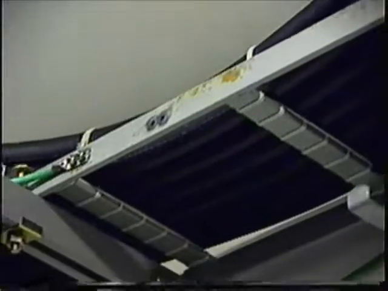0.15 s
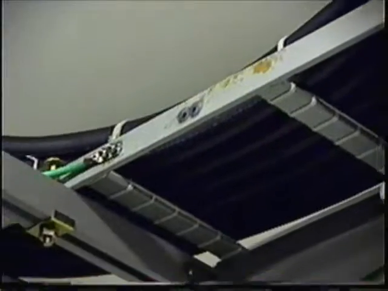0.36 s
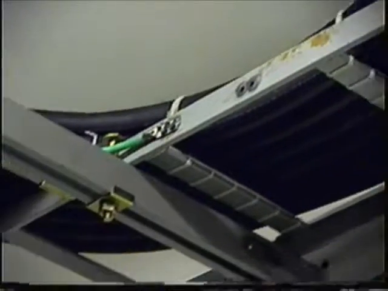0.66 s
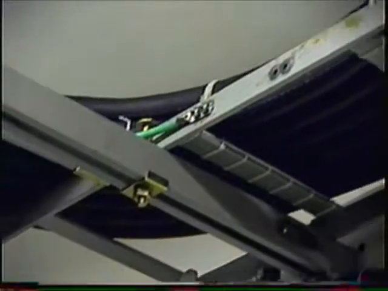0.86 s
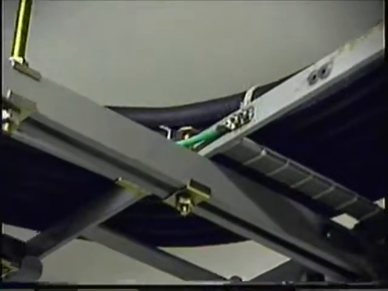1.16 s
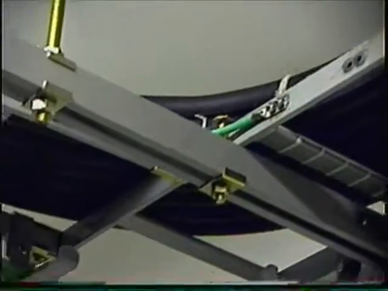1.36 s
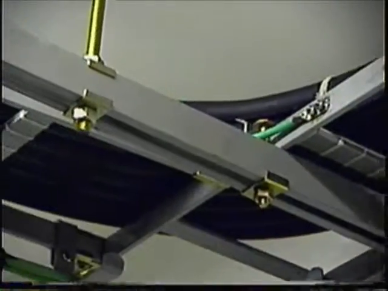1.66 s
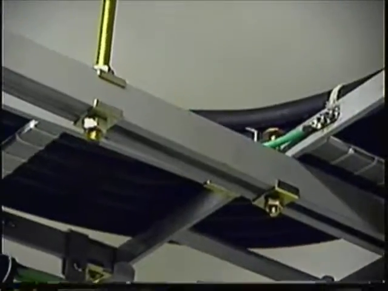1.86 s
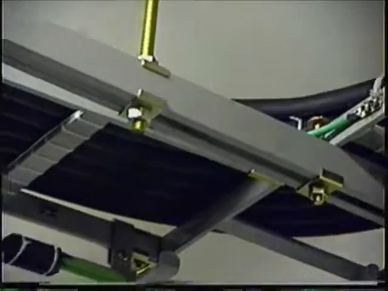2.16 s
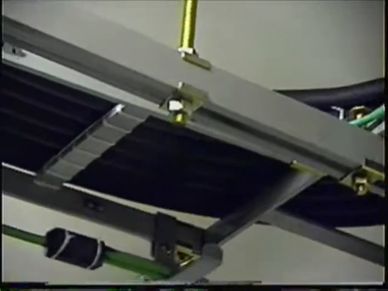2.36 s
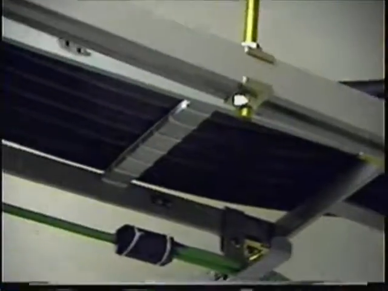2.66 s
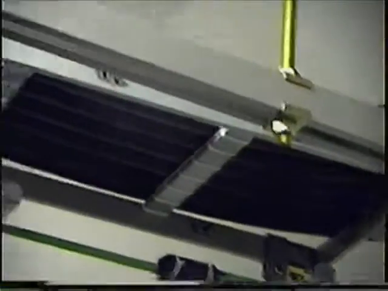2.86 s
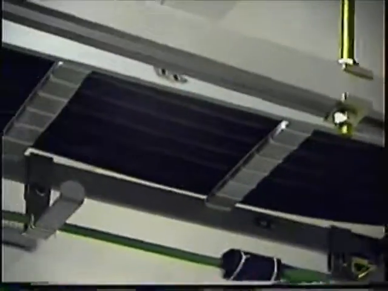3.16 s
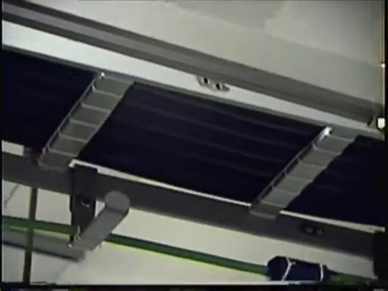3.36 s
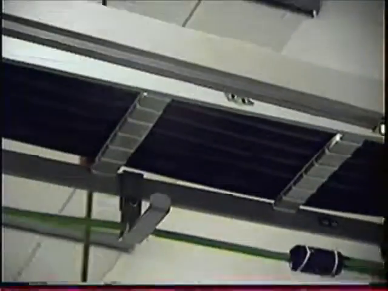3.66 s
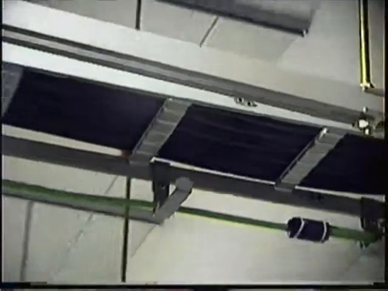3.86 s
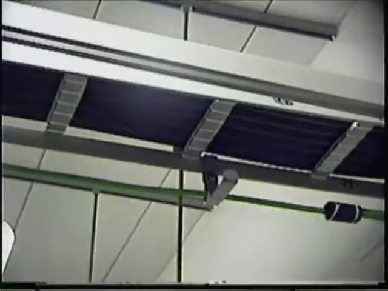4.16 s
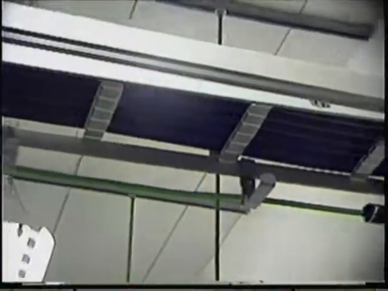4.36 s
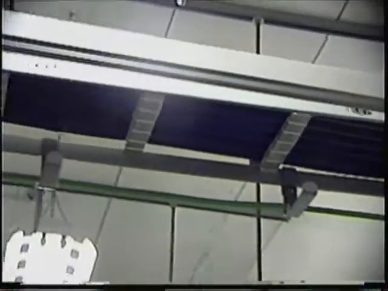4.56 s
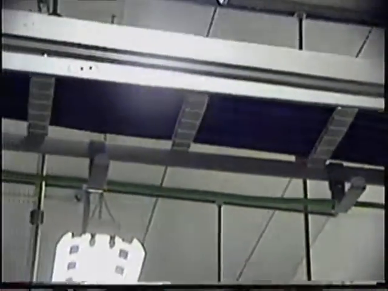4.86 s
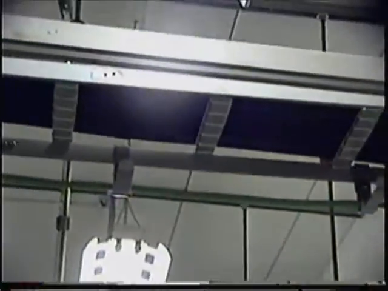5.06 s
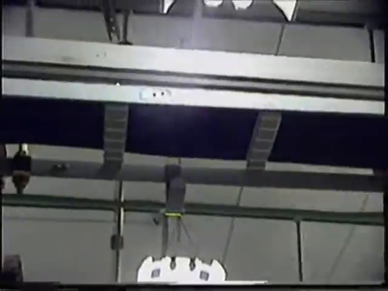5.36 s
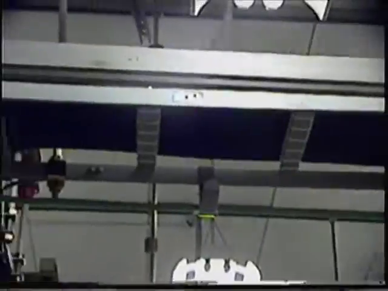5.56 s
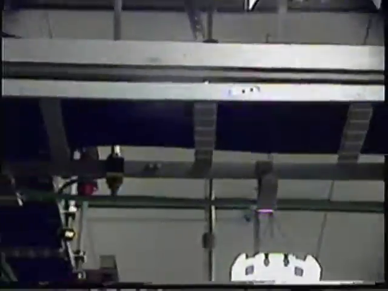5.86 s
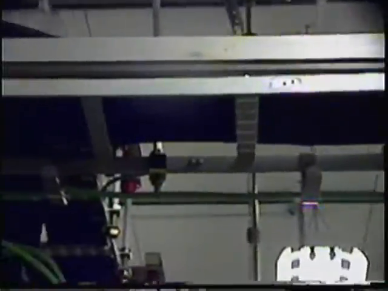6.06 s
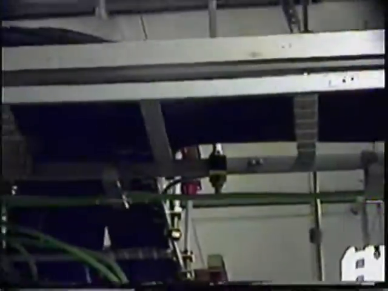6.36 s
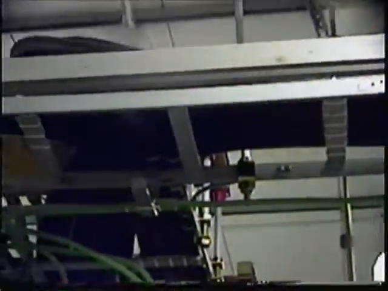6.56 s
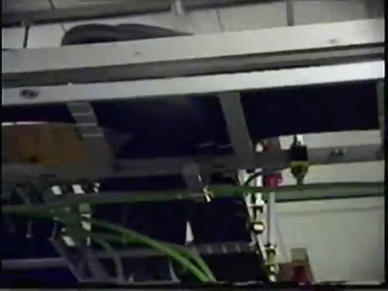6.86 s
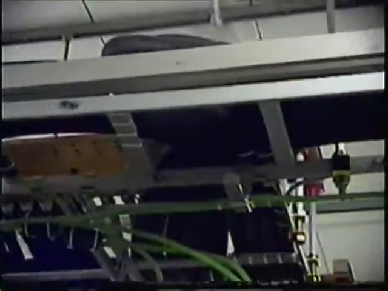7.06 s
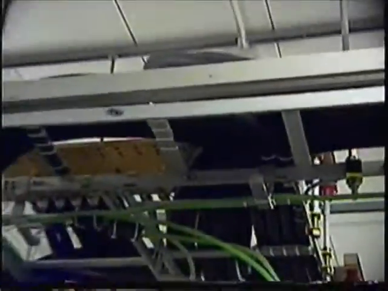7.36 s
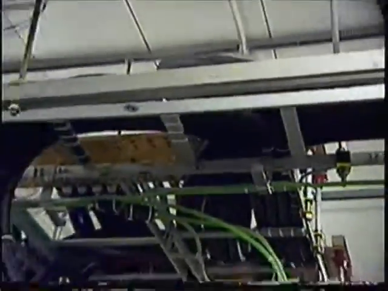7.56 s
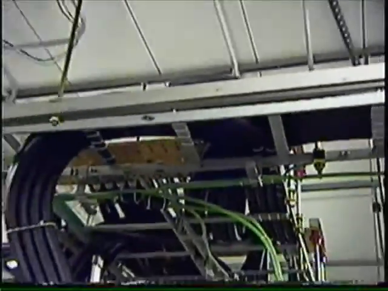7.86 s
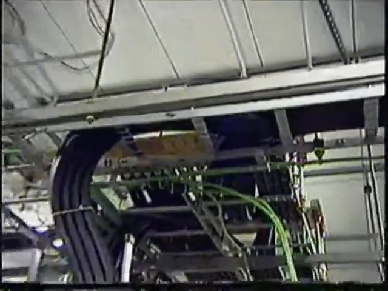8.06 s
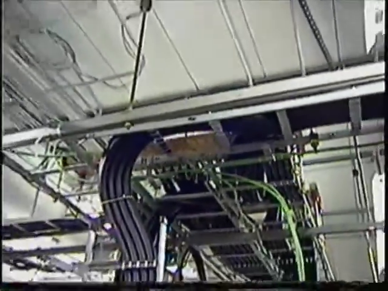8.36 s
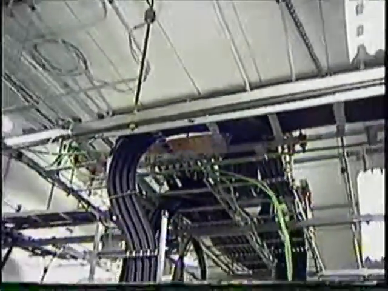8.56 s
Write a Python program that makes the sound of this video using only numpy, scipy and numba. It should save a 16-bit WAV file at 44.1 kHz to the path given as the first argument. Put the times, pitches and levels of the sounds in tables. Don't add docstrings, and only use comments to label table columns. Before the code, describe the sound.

Transformer-like drone, raspy buzz and fluttering fan whine continue under high hiss, broken by faint handling clicks and a brief brush at the end.

```python
import sys
import numpy as np
from scipy import signal
from scipy.fft import rfft, irfft, next_fast_len
from scipy.io import wavfile
from scipy.ndimage import uniform_filter1d
from numba import njit

SR = 44100
rng = np.random.default_rng(int(sys.argv[2]) if len(sys.argv) > 2 else 0)


def undo_db(level):
    steps = np.asarray(level, float) / 20
    return 10 ** steps


def to_wav(sig):
    pcm = np.clip(np.atleast_2d(sig), -1, 1) * 32767
    pcm = np.round(pcm).astype(np.int16)
    wavfile.write(sys.argv[1], SR, pcm.T)


N = 383669

MAINS_HZ, MOTOR_HZ, SCAN_HZ, FIELD_HZ = 60.0035, 162.8, 15734.26, 59.94
WHINE_HZ, WHINE_DB, OCTAVE_DB = 1131.7, -44.1, -64.2
TURN_S, TURN_WIDTH_S = 4.5, .2
MOTOR_SWING_DB = -15.1
AIM_OCTAVES, PANEL_OCTAVES = .09, .006
HOP_SAMPLES = 441

TIME_S = np.arange(N) / SR
FRAME_S = np.arange(N // HOP_SAMPLES + 2) * HOP_SAMPLES / SR
TURNED = 1 / (1 + np.exp((TURN_S - FRAME_S) / TURN_WIDTH_S))
SWING = 1.3 * np.clip(FRAME_S / FRAME_S[-1] * 1.6 - .3, 0, 1) - .15

# f/Hz, level/dB per Hz
AIR_DENSITY = [(20, -100), (36, -90), (55, -99.2), (90, -87), (200, -87), (300, -83.5), (450, -88.5),
               (800, -87), (1400, -89), (1850, -92), (2250, -89.5), (2700, -95), (3200, -91), (3650, -92),
               (4200, -86), (5000, -86)]
# f/Hz, level/dB per Hz
TAPE_DENSITY = [(7000, -91), (7650, -95), (8600, -103), (9800, -108.8), (11500, -113.8), (14000, -114.5),
                (15000, -109.3), (15600, -105.6)]
# f/Hz, width/Hz, level/dB per Hz, share of time/1
PATCHES = [(1700, 400, -125, 0.055), (2650, 600, -104, .45), (4020, 920, -102, .1), (5720, 700, -94, .22),
           (7360, 660, -105, 0.053), (8000, 700, -112, 0.062), (9100, 950, -114, .2),
           (10600, 800, -120, 0.073), (15400, 700, -110, .15)]
# t/s, half length/s, f/Hz, gain/dB
AIM = [(2.41, 0.3, 2960.0, 2.0), (5.67, 0.5, 2960.0, -2.7), (4.09, 0.3, 3370.0, 2.6),
       (7.94, 0.5, 3520.0, 2.3), (5.8, 0.3, 3840.0, -2.7), (8.36, 0.3, 4010.0, 2.8),
       (0.33, 0.5, 4190.0, -1.7), (4.69, 0.15, 4190.0, 3.6), (6.59, 0.3, 4190.0, 4.0),
       (3.02, 0.5, 4370.0, 2.0), (5.94, 0.5, 4570.0, -2.2), (0.19, 0.5, 4770.0, -2.8),
       (4.37, 0.3, 4770.0, -2.3), (2.79, 0.9, 4980.0, 2.6), (6.08, 0.9, 5200.0, -3.2),
       (1.3, 0.3, 5430.0, 2.8), (4.78, 0.3, 5670.0, -2.8), (4.64, 0.5, 7040.0, -2.8),
       (6.73, 0.9, 7040.0, 2.1), (7.29, 0.3, 8020.0, 2.0)]
# t/s, relative speed/1
TRAVEL = [
    (0, .7),
    (4.2, .7),
    (4.5, 1.6),
    (5, .8),
    (6.8, .8),
    (7.3, 2.2),
    (8.7, 2.2),
]
# t/s, half length/s, f/Hz, gain/dB
STANDING_WAVES = [(0.11, 1.04, 240, 2.4), (4.41, 0.12, 300, 9.6), (0.28, 0.98, 360, -6.4),
                  (8.7, 1.37, 360, -10.4), (0.0, 1.5, 480, 4.8), (8.36, 0.73, 600, -12.2),
                  (7.3, 0.1, 660, 7.8), (0.31, 0.48, 720, 8.5), (1.37, 0.35, 720, 6.5),
                  (4.91, 0.24, 720, -6.2), (6.22, 0.27, 720, -6.6), (7.45, 0.38, 720, -4.2),
                  (3.9, 0.48, 780, 4.9), (8.7, 0.6, 780, -9.3), (8.1, 0.74, 840, 8.3),
                  (5.78, 1.36, 960, -5.6), (6.78, 1.5, 1080, -16.1), (8.43, 1.5, 1200, -7.1),
                  (7.53, 0.13, 1320, -18.0), (8.25, 0.6, 1320, 5.4), (5.88, 0.14, 1440, 8.9),
                  (8.01, 1.5, 1560, -15.7), (4.38, 1.17, 1680, 5.7), (7.07, 0.43, 1800, -13.2),
                  (8.35, 0.18, 1800, -14.5), (3.46, 1.5, 1920, 4.6), (6.65, 0.74, 1920, -8.6),
                  (7.94, 0.4, 2040, -8.0), (4.93, 1.5, 2160, -18.0), (7.13, 0.46, 2160, -10.8),
                  (2.36, 0.19, 2280, 10.0), (3.08, 1.45, 2280, -5.2), (8.35, 1.22, 2280, -12.7),
                  (3.79, 1.5, 2400, -7.0), (8.32, 0.29, 2400, -9.4), (6.44, 1.28, 2520, -14.0),
                  (4.17, 0.58, 2640, 6.1), (1.85, 1.5, 2760, -11.1), (4.87, 0.96, 2760, 6.4),
                  (0.0, 0.64, 326, -6.3), (1.74, 0.96, 326, -8.3), (4.25, 0.11, 326, -13.6),
                  (4.92, 0.51, 326, 4.6), (6.51, 0.32, 326, 11.3), (7.26, 0.13, 326, -8.9),
                  (8.04, 1.19, 326, 15.0)]
# t/s, peak level/dB, f/Hz, t60/s, sign/1
CLICKS = [(3.3517, -26, 800, 0.01, -1), (3.3518, -40, 1500, 0.0055, -1), (3.385, -39, 890, .012, 1),
          (3.444, -27, 5000, 0.004, 1), (3.444, -46, 9500, .002, 1), (3.444, -50, 14000, .003, 1),
          (3.608, -33.5, 700, .009, 1), (3.7796, -25, 740, 0.0055, 1), (3.7797, -32, 4700, .003, 1),
          (4.0991, -26.5, 2650, 0.0062, 1), (4.0992, -29.5, 1900, 0.0054, 1), (4.1, -38, 1300, .008, 1),
          (4.101, -43, 780, .03, 1), (6.3378, -32.5, 920, 0.037, -1), (6.3422, -36, 907, .015, 1),
          (7.3114, -27.5, 750, 0.009, -1), (7.484, -42, 700, 0.0092, 1), (7.78, -59, 10000, .004, 1)]
# start t/s, length/s, gain/dB
BRUSHES = [
    (8.595, .075, -20),
    (8.66, .05, -22),
    (7.77, .025, -30),
]
# multiple/1, rms level/dB
MOTOR = [(1, -71), (2, -62), (3, -65), (4, -64.5), (5, -73.5), (6, -73), (8, -70), (9, -83), (10, -86)]
# sideband below/1, rms level/dB
SCAN = [(0, -73.9), (1, -81.2), (2, -84.0), (3, -86.7), (4, -90.3), (5, -89.8), (6, -92.4), (7, -89.1),
        (8, -93.4), (9, -90.3), (10, -90.1), (11, -96.6), (12, -102.1)]
# t/s, brightness gain/dB, fine detail gain/dB
SCAN_LEAK = [
    (0, -1.5, -3),
    (1.2, .3, -0.5),
    (2.6, -3, 0),
    (3.5, 1, 0.5),
    (5.5, 2, 0),
    (6.4, 0, 2),
    (7.5, -6, -1),
    (8.1, -6, -1),
    (8.7, -5, -1),
]
# t/s, depth/dB, half length/s, pull/Hz
WHINE_FADES = [(0, -6.5, 0.05, 4), (0.534, -17.2, 0.044, -7.3), (0.959, -10.5, 0.065, -9.3),
               (1.132, -4.9, 0.031, 2.4), (1.683, -9.2, 0.087, 1.5), (1.866, -30.0, 0.023, -10.2),
               (1.886, -5.7, 0.039, -2.1), (2.065, -7.6, 0.035, -5.1), (2.152, -7.8, 0.027, -5.0),
               (2.264, -9.0, 0.051, 8.1), (2.38, -5.4, 0.023, 0.5), (2.454, -8.1, 0.029, -0.3),
               (2.756, -14.7, 0.059, -7.8), (3.033, -11.5, 0.072, -4.0), (3.187, -7.4, 0.062, -8.3),
               (3.258, -15.2, 0.06, -4.6), (3.369, -11.7, 0.041, -9.9), (3.439, -8.6, 0.062, -2.7),
               (3.581, -4.9, 0.015, 1.4), (3.874, -3.5, 0.08, -1.0), (4.136, -30.0, 0.033, -0.7),
               (4.14, -2.1, 0.204, -1.8), (4.306, -8.3, 0.02, -4.1), (4.442, -10.2, 0.062, -1.4),
               (4.608, -6.0, 0.109, -5.3), (4.653, -9.8, 0.024, -2.8), (4.865, -10.1, 0.051, -2.0),
               (5.228, -7.8, 0.118, -0.6), (5.469, -7.2, 0.021, 0.5), (5.668, -14.1, 0.02, 11.3),
               (5.722, -7.0, 0.021, -0.2), (5.842, -2.0, 0.092, 2.0), (6.143, -3.7, 0.101, 0.3),
               (6.746, -6.8, 0.3, -2.1), (6.762, -12.7, 0.024, 5.5), (7.019, -16.3, 0.053, 11.8),
               (7.174, -5.0, 0.035, -0.2), (7.583, -15.8, 0.039, 6.0), (7.638, -7.2, 0.02, -15.4),
               (7.73, -13.0, 0.085, -10.8), (7.805, -19.9, 0.056, 5.8), (7.895, -8.3, 0.021, -3.3),
               (7.998, -12.3, 0.082, -5.3), (8.166, -9.2, 0.026, 1.5), (8.195, -27.7, 0.037, -6.5),
               (8.475, -18.0, 0.02, 0.8), (8.514, -14.1, 0.071, -2.7), (8.642, -11.7, 0.075, -10.2)]
# t/s, half length/s, gain/dB
OCTAVE_BEADS = [(0.06, 0.04, 4.8), (0.97, 0.04, -3.5), (1.16, 1.0, 2.4), (1.65, 0.07, -4.0),
                (1.97, 0.04, 4.7), (2.27, 0.04, 3.1), (2.5, 0.07, 5.3), (2.73, 0.07, -3.3),
                (2.88, 0.07, 3.5), (3.71, 0.12, 2.2), (3.98, 0.12, 4.0), (4.21, 0.04, 3.7),
                (5.28, 0.6, -1.6), (7.19, 1.0, -2.3), (7.67, 0.07, 3.4), (8.6, 0.07, -4.5)]
# t/s, f/Hz
OCTAVE_PITCH = [
    (3.5, 2252),
    (4.6, 2270),
    (6.8, 2268),
    (7.7, 2252),
]
# multiple of mains/1, rms level at first rack/dB, at second/dB
HUM = [(2, -61.1, -60.2), (3, -73.7, -73.2), (4, -52.5, -53.1), (5, -73.4, -73.9), (6, -51.6, -53.5),
       (7, -74.5, -71.1), (8, -67.5, -59.8), (9, -67.9, -71.6), (10, -60.2, -55.5), (11, -61.9, -65.5),
       (12, -67.2, -60.5), (13, -68.3, -66.1), (14, -60.6, -62.8), (16, -63.2, -69.5), (17, -72.6, -76.8),
       (18, -70.0, -60.5), (20, -71.9, -60.3), (22, -68.6, -71.1), (24, -76.9, -68.2), (26, -67.6, -64.7),
       (28, -67.5, -75.2), (30, -72.0, -63.9), (32, -71.7, -71.5), (34, -67.5, -66.9), (36, -64.7, -67.5),
       (38, -67.0, -64.0), (40, -73.2, -68.4), (42, -74.9, -66.5), (44, -78.2, -72.3), (46, -67.4, -75.2)]
# f/Hz, rms level/dB
EVEN_BUZZ = [(1560, -69), (1920, -68.5), (2280, -63), (2640, -74.5), (2800, -89.5), (6500, -66.5),
             (6960, -65), (7800, -78.5), (9000, -81.5), (10800, -102)]
# f/Hz, rms level/dB
ODD_BUZZ = [(1560, -82.5), (2400, -73), (2900, -81), (3500, -82), (4200, -80), (5200, -73), (6500, -80),
            (7300, -79), (8000, -87), (9400, -91), (10800, -104.0)]
# multiple of mains/1, rms level at first rack/dB, at second/dB
RACK_PANELS = [(48, -64.1, -71.8), (50, -59.2, -71.8), (52, -68.1, -58.4), (54, -63.2, -64.8),
               (56, -68.3, -64.6), (58, -60.9, -66.5), (60, -70.8, -60.7), (62, -67.8, -70.6),
               (64, -59.6, -62.0), (66, -66.2, -59.5), (68, -59.8, -52.7), (70, -57.8, -55.2),
               (72, -58.3, -61.9), (74, -66.1, -59.9), (76, -54.0, -62.8), (78, -60.4, -65.7),
               (80, -67.9, -68.6), (82, -59.7, -58.2), (84, -66.6, -62.1), (86, -58.6, -48.9),
               (88, -56.8, -64.0), (90, -57.1, -61.1), (92, -67.3, -56.7), (94, -55.8, -71.9),
               (96, -61.3, -62.9), (98, -63.1, -69.4), (100, -73.2, -66.9), (102, -72.0, -67.0),
               (104, -77.9, -66.0), (106, -57.8, -67.5), (108, -69.2, -64.1), (110, -66.8, -64.9),
               (112, -65.4, -69.8), (114, -66.4, -72.8), (116, -73.8, -67.9), (118, -72.2, -72.5),
               (120, -70.4, -70.4)]
# t/s, half length/s, f/Hz, gain/dB
PANEL_NODES = [(6.59, 0.79, 3000, 11.2), (6.58, 1.5, 3120, -7.9), (2.54, 1.13, 3240, -7.2),
               (6.55, 0.84, 3240, 6.6), (4.31, 0.52, 3360, 8.5), (5.83, 0.21, 3360, -13.7),
               (7.7, 0.16, 3360, -13.3), (8.45, 0.77, 3360, 6.4), (6.49, 1.5, 3480, 7.3),
               (7.15, 0.2, 3480, -15.6), (5.95, 0.71, 3600, -18.0), (7.09, 0.19, 3600, -12.0),
               (5.24, 0.69, 3720, 8.7), (7.19, 1.5, 3840, -14.8), (7.73, 0.34, 3840, 15.0),
               (3.08, 1.1, 3960, 6.2), (6.14, 0.43, 3960, -15.9), (7.64, 0.16, 3960, -9.0),
               (0.15, 0.47, 4080, -6.6), (2.17, 0.45, 4080, -8.5), (5.31, 0.69, 4080, -9.0),
               (7.68, 0.31, 4080, -16.6), (7.69, 0.15, 4080, 15.0), (2.3, 1.22, 4200, 5.8),
               (5.75, 0.88, 4200, -6.2), (7.63, 0.43, 4200, -11.9), (3.05, 0.54, 4320, -3.8),
               (4.48, 0.13, 4320, -16.8), (5.18, 0.39, 4320, -13.2), (6.41, 0.68, 4320, 10.4),
               (7.18, 0.1, 4320, -12.8), (7.98, 0.2, 4320, 7.6), (3.12, 0.85, 4440, 10.1),
               (5.0, 0.57, 4440, 7.0), (6.0, 0.17, 4440, -12.8), (7.94, 0.14, 4440, -11.1),
               (0.0, 0.56, 4560, -18.0), (3.64, 0.49, 4560, -3.4), (5.37, 0.69, 4560, -13.4),
               (7.57, 0.66, 4560, 9.4), (2.03, 0.34, 4680, 4.1), (7.24, 0.46, 4680, 9.0),
               (8.37, 0.38, 4680, 6.3), (4.19, 0.27, 4800, -11.0),
               (5.19, 1.5, 4800, 12.7), (7.27, 0.45, 4800, 8.3), (2.78, 1.5, 4920, 5.6),
                     (6.26, 1.16, 4920, -13.2), (1.45, 0.68, 5040, 9.1), (6.03, 1.16, 5040, 5.6),
                     (0.08, 0.57, 5160, -6.5), (5.95, 1.5, 5160, -11.4), (7.83, 0.2, 5160, 13.3),
                     (8.01, 1.26, 5160, -18.0), (4.5, 0.72, 5280, 3.9), (4.64, 0.18, 5280, -17.3),
                     (4.59, 0.12, 5400, -15.8), (5.82, 0.35, 5400, -9.6), (7.31, 0.21, 5400, -9.4),
                     (8.21, 1.5, 5400, 4.5), (1.12, 1.19, 5520, 10.4), (4.93, 0.51, 5520, -9.9),
                     (6.66, 1.1, 5520, -18.0), (7.27, 0.3, 5520, 10.5), (1.07, 1.5, 5640, -13.9),
                     (6.87, 0.58, 5640, 14.7), (8.32, 0.25, 5640, 9.5), (2.83, 0.5, 5760, -13.3),
                     (4.73, 0.2, 5760, -12.7), (6.47, 0.43, 5760, -18.0), (3.4, 0.32, 5880, -6.9),
                     (6.08, 1.44, 5880, 13.0), (8.0, 0.26, 5880, 9.8), (0.35, 1.4, 6000, 13.4),
                     (5.78, 0.2, 6000, -14.9), (4.18, 0.44, 6120, 8.3), (1.42, 1.46, 6240, 15.0),
                     (6.11, 0.74, 6240, 6.6), (1.48, 1.5, 6360, -14.5), (5.06, 0.45, 6360, -11.2),
                     (5.73, 0.19, 6480, -17.2), (8.29, 0.29, 6480, -17.1), (0.74, 0.2, 6600, -14.1),
                     (1.01, 0.83, 6720, -10.9), (6.74, 0.98, 6840, 10.0), (2.6, 1.5, 7080, 8.9),
                     (7.25, 0.26, 7080, 10.5), (0.34, 1.08, 7200, 7.3)]
# t/s, half length/s, f/Hz, gain/dB
HAND_SHADE = [
    (8.67, .05, 4050, -10),
]


@njit
def tones(hz, gain, hop):
    out = np.zeros((gain.shape[1] - 1) * hop)
    for k in range(len(hz)):
        z, turn = 1. + 0j, np.exp(2j * np.pi * hz[k] / SR)
        for f in range(gain.shape[1] - 1):
            g = gain[k, f]
            step = (gain[k, f + 1] - gain[k, f]) / hop
            for i in range(f * hop, (f + 1) * hop):
                out[i] += (g * z).imag
                g, z = g + step, z * turn
    return out


def partials(hz, rms_db, wander):
    return tones(hz, np.sqrt(2) * undo_db(rms_db) * wander, HOP_SAMPLES)[:N]


def noise(db_of_hz):
    size = next_fast_len(N)
    hz = np.maximum(np.fft.rfftfreq(size, 1 / SR), 1)
    white = rfft(rng.standard_normal(size))
    return irfft(white * undo_db(db_of_hz(hz)) * np.sqrt(SR / 2), size)[:N]


def spectrum(table, hz):
    f, db = np.transpose(table)
    return np.interp(np.log(hz), np.log(f), db)


def curves(table, t):
    s, *columns = np.transpose(table)
    return np.array([np.interp(t, s, c) for c in columns])


def per_sample(frame_values):
    return np.interp(TIME_S, FRAME_S, frame_values)


def passing(table, hz, octaves):
    s, half_s, centre_hz, db = np.transpose(table)[:, :, None]
    in_pitch = np.exp(-(np.log2(np.atleast_1d(hz) / centre_hz) / octaves) ** 2)
    in_time = np.exp(-((FRAME_S - s) / half_s) ** 2)
    return in_pitch.T @ (db * in_time)


def aim_db(hz):
    return passing(AIM, hz, AIM_OCTAVES)


def fading(hz, steady, rate_per_khz, start=None):
    rate_hz = np.fft.fftfreq(len(FRAME_S), HOP_SAMPLES / SR)
    scatter = rng.standard_normal((len(hz), len(rate_hz), 2)) @ np.array([1, 1j])
    width_hz = 0.075 + rate_per_khz * hz[:, None] / 1000
    echo = np.fft.ifft(scatter * np.exp(-(rate_hz / width_hz) ** 2), axis=1)
    place = np.cumsum(curves(TRAVEL, FRAME_S)[0]).astype(int) % len(rate_hz)
    echo = echo[:, place]
    echo = echo / np.sqrt(np.mean(abs(echo) ** 2, axis=1, keepdims=True))
    steady = np.clip(steady, 0, 1)[:, None]
    if start is None:
        start = 2 * np.pi * rng.random(len(hz))
    return np.exp(1j * start[:, None]) * np.sqrt(steady) + np.sqrt(1 - steady) * echo


def stereo_patches():
    out = 0
    for hz, width_hz, db, share in PATCHES:
        held = uniform_filter1d(rng.standard_normal(len(FRAME_S)), size=3)
        gate = held > np.quantile(held, 1 - share)
        band = noise(lambda f: db - 60 * (abs(f - hz) > width_hz / 2))
        out = out + band * per_sample(gate)
    return out


def air():
    wide = rfft(noise(lambda f: spectrum(AIR_DENSITY + TAPE_DENSITY, f)))
    hz = np.maximum(np.fft.rfftfreq(N, 1 / SR), 1)
    centres_hz = 1500 * 2 ** np.arange(0, 3.1, .125)
    flicker = uniform_filter1d(rng.standard_normal((len(centres_hz), len(FRAME_S))), 25, axis=1)
    aim = aim_db(centres_hz)
    electrical = centres_hz[:, None] > 9500
    leak_db = 0.56 * electrical * (curves(SCAN_LEAK, FRAME_S)[1] - aim)
    out = 0
    for k, db in enumerate(aim + leak_db + 4 * flicker):
        strip = np.interp(np.log(hz), np.log(centres_hz), np.arange(len(centres_hz)) == k)
        out = out + irfft(wide * strip, N) * per_sample(undo_db(db))
    return out


def handling():
    clicks, t = np.zeros(N), np.arange(2000) / SR
    for s, db, hz, t60_s, sign in CLICKS:
        decay = np.exp(-np.log(1000) * t / t60_s)
        attack = 1 - np.exp(-t * hz * 5.9)
        ring = np.sin(2 * np.pi * hz * t) * decay * attack
        at = int(s * SR)
        clicks[at:at + len(t)] += sign * undo_db(db) * ring / abs(ring).max()
    clicks = signal.sosfilt(signal.butter(2, 220, "high", fs=SR, output="sos"), clicks)
    density = [(3500, -90), (4800, -66), (7000, -60.5), (8500, -82), (11000, -86), (15000, -100)]
    brush = noise(lambda f: spectrum(density, f))
    shape = sum(undo_db(db) * np.exp(-((TIME_S - s - d / 2) / (d / 2)) ** 4) for s, d, db in BRUSHES)
    return clicks + brush * shape


def motor():
    order, db = np.transpose(MOTOR)
    hz = order * MOTOR_HZ
    db = db[:, None] + passing(STANDING_WAVES, hz, PANEL_OCTAVES)
    db[1] += MOTOR_SWING_DB * (SWING - .5)
    return partials(hz, db, fading(hz, 1.1 - 0.53 * hz / 1000, 2.7))


def coils():
    hz = np.array([8921.5, 7406.1, 84., 250.3])
    db = np.array([-80.5, -80, -85.0, -84])
    return partials(hz, db[:, None], fading(hz, np.ones(len(hz)), 0.041))


def line_scan():
    side, db = np.transpose(SCAN)
    brightness_db, detail_db = curves(SCAN_LEAK, FRAME_S)
    hz = SCAN_HZ - side * FIELD_HZ
    side = side[:, None]
    leak_db = np.where(side <= 2, brightness_db, 2.4 * detail_db)
    carrier_db = 3.2 * (side == 0)
    steady = np.where(side[:, 0] <= 1, .97, .6)
    return partials(hz, db[:, None] + leak_db + carrier_db, fading(hz, steady, .02))


def fan_octave():
    s, half_s, gain_db = np.transpose(OCTAVE_BEADS)[:, :, None]
    hz = np.array([2 * WHINE_HZ])
    offset_hz = curves(OCTAVE_PITCH, FRAME_S)[0] - hz
    drift = np.exp(2j * np.pi * np.cumsum(offset_hz) * HOP_SAMPLES / SR)
    db = OCTAVE_DB + (gain_db * np.exp(-((FRAME_S - s) / half_s) ** 2)).sum(axis=0)
    return partials(hz, db, drift * fading(hz, np.array([.7]), 8))


def fan_whine():
    s, depth_db, half_s, pull_hz = np.transpose(WHINE_FADES)[:, :, None]
    fine_s = np.arange(0, N + 64, 64) / SR
    dip = 1 / (1 + ((fine_s - s) / half_s) ** 2)
    left_db = 10 * np.log10(1 - dip * (1 - undo_db(2 * depth_db)))
    hz = np.interp(TIME_S, fine_s, WHINE_HZ + (pull_hz * dip).sum(axis=0))
    fade_db = np.interp(TIME_S, fine_s, left_db.sum(axis=0))
    tone = np.sqrt(2) * undo_db(WHINE_DB) * np.sin(2 * np.pi * np.cumsum(hz) / SR)
    skirt = noise(lambda f: -81.5 - 10 * np.log10(1 + ((f - 1128) / 20) ** 2) - 40 * (abs(f - 1128) > 120))
    duct = noise(lambda f: -88 - 10 * ((f - 2400) / 100) ** 4)
    return undo_db(fade_db) * (tone + skirt) + duct + fan_octave()


def core_hum():
    order, first_db, second_db = np.transpose(HUM)
    hz = order * MAINS_HZ
    db = first_db[:, None] + SWING * (second_db - first_db)[:, None]
    db = db + passing(STANDING_WAVES, hz, PANEL_OCTAVES)
    crest = np.pi / 2 + hz / 700 * rng.standard_normal(len(hz))
    steady = np.maximum(1 - 0.19 * (hz / 1000) ** 2, .98)
    return partials(hz, db, fading(hz, steady, 0.065, crest))


def lamination_buzz():
    order = np.setdiff1d(np.arange(25, 181), np.array(HUM)[:, 0])
    hz = order * MAINS_HZ
    db = np.where(order % 2, spectrum(ODD_BUZZ, hz), spectrum(EVEN_BUZZ, hz))
    db = db + 1.3 * rng.standard_normal(len(hz))
    db = db[:, None] + aim_db(hz)
    multiple, first_db, second_db = np.transpose(RACK_PANELS)[:, :, None]
    panel = np.isin(order, multiple)
    db[panel] = first_db + TURNED * (second_db - first_db)
    db = db + passing(PANEL_NODES, hz, PANEL_OCTAVES)
    db = db + passing(HAND_SHADE, hz, AIM_OCTAVES)
    strikes = 2 * np.pi / 3 * (order // 2) ** 2
    smear = 1.2 * rng.standard_normal(len(hz))
    steady = np.where(panel, .995, .7)
    return partials(hz, db, fading(hz, steady, 0.055, strikes + smear))


def scene():
    camcorder = handling() + motor() + coils() + line_scan()
    mid = air() + camcorder + fan_whine() + core_hum() + lamination_buzz()
    side = stereo_patches()
    return np.array([mid + side, mid - side])


def roll_off(x):
    return signal.sosfilt(signal.butter(12, 15752, fs=SR, output="sos"), x)


def record(dry):
    return roll_off(dry)


dry = scene()
out = record(dry)
to_wav(out)
```